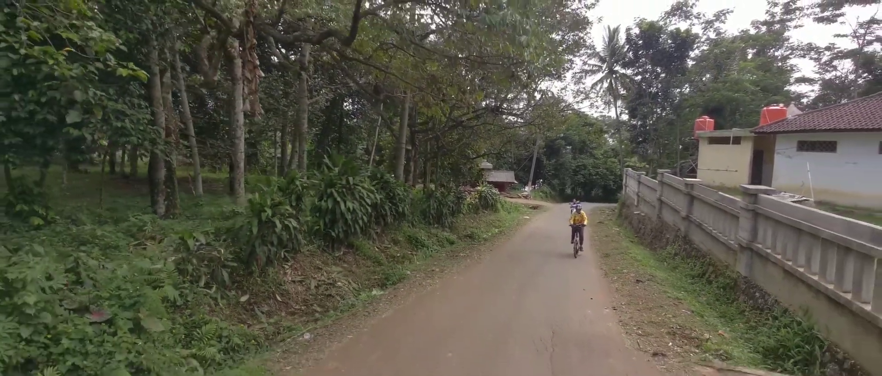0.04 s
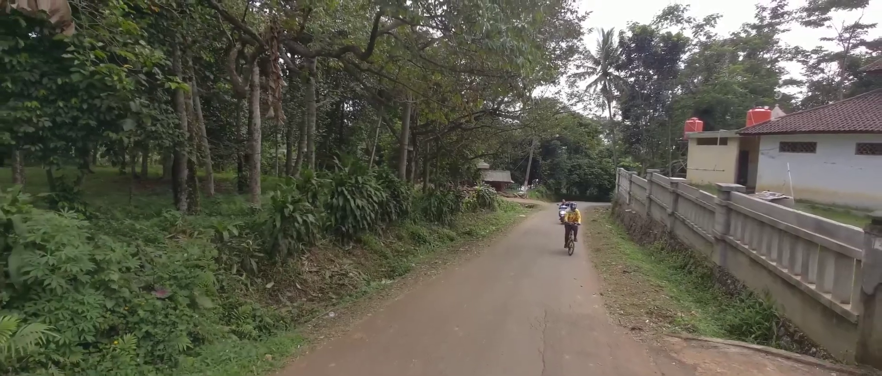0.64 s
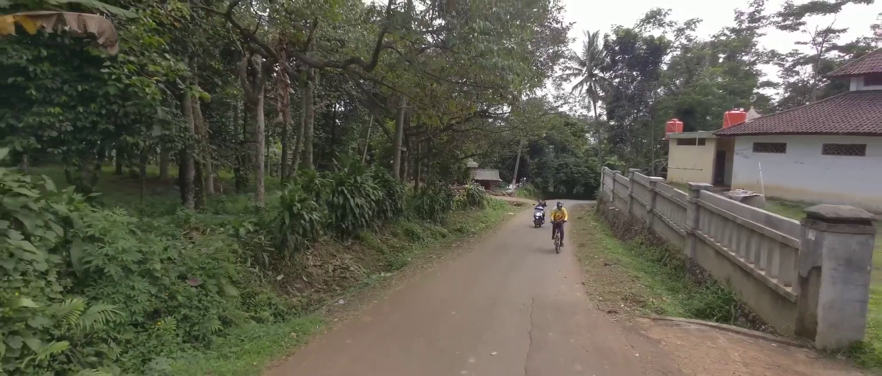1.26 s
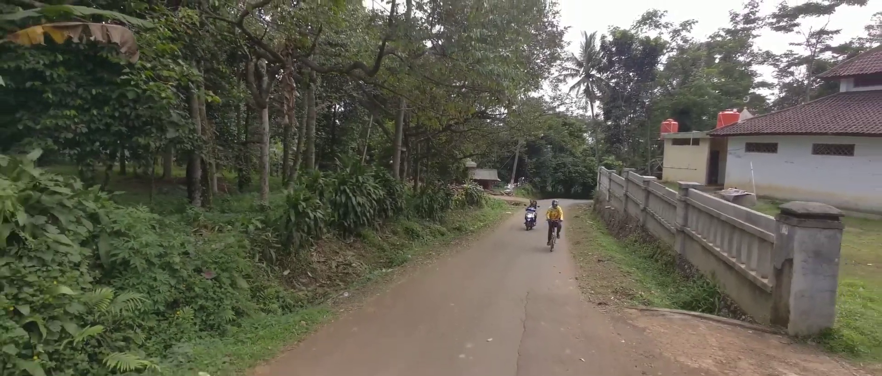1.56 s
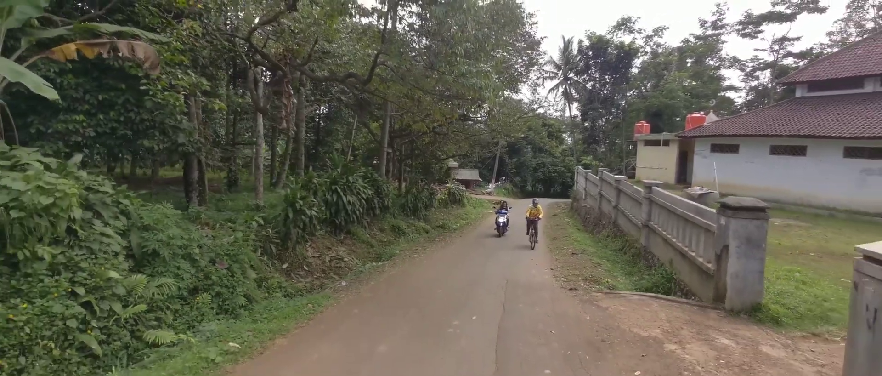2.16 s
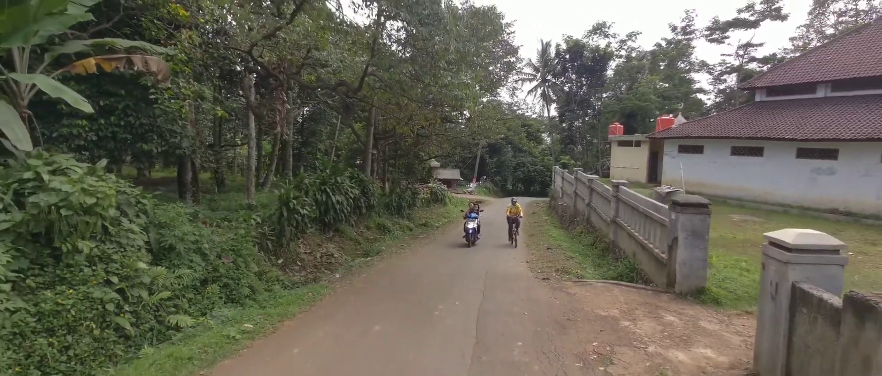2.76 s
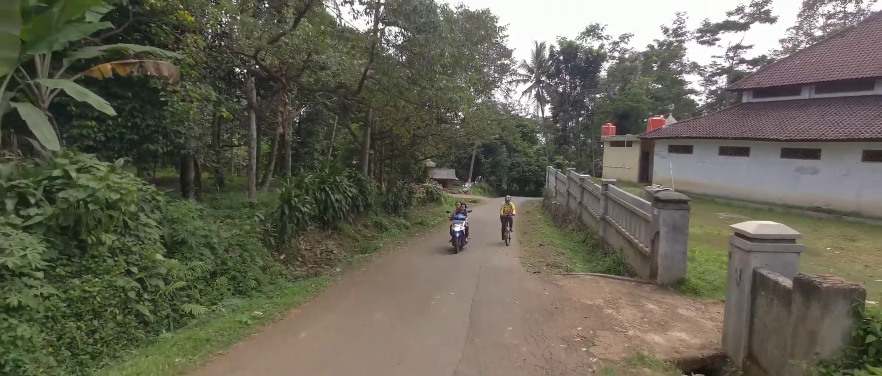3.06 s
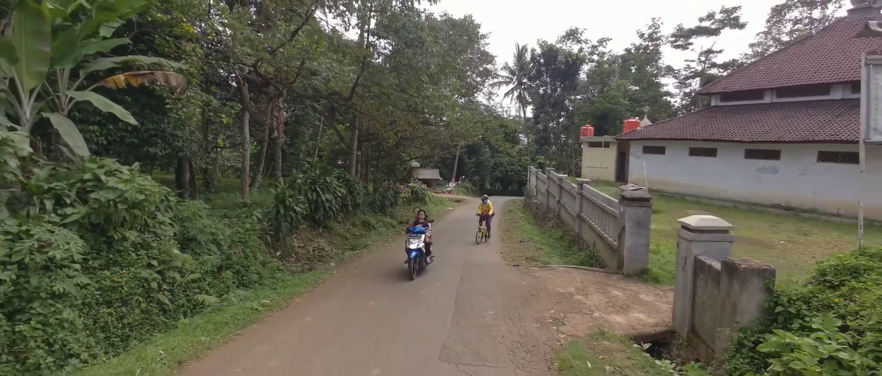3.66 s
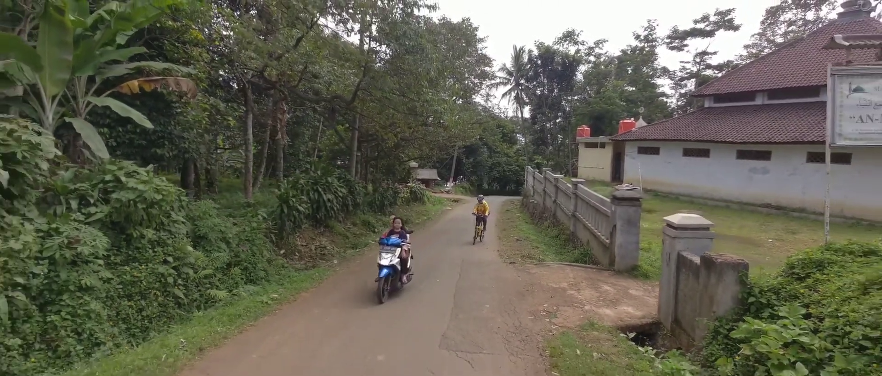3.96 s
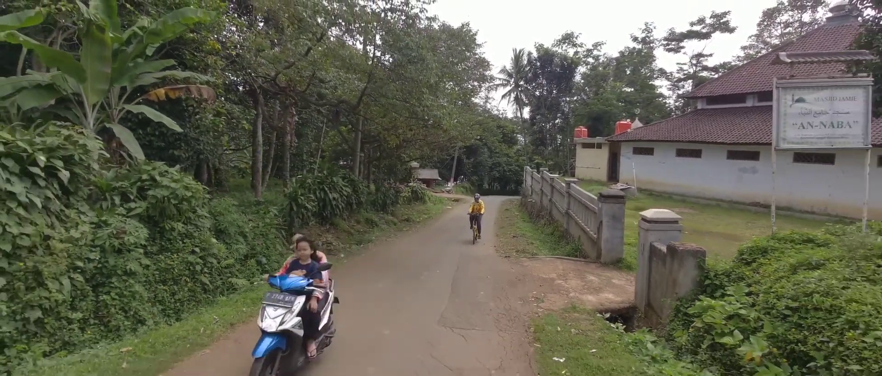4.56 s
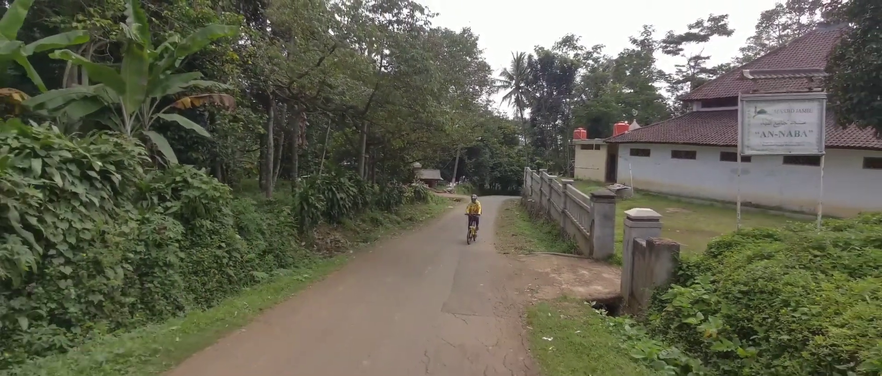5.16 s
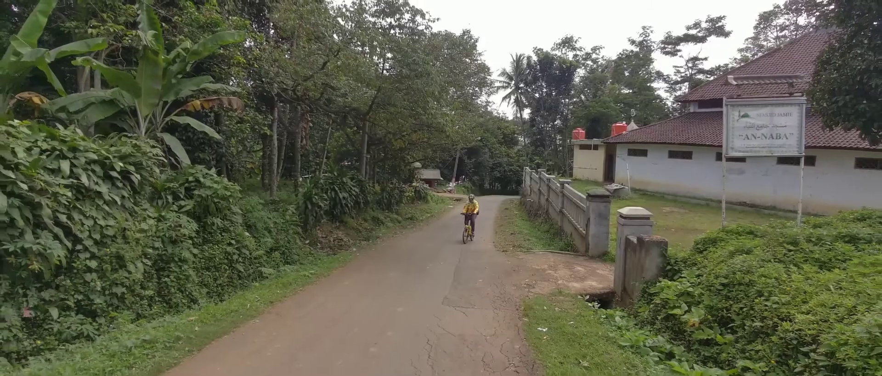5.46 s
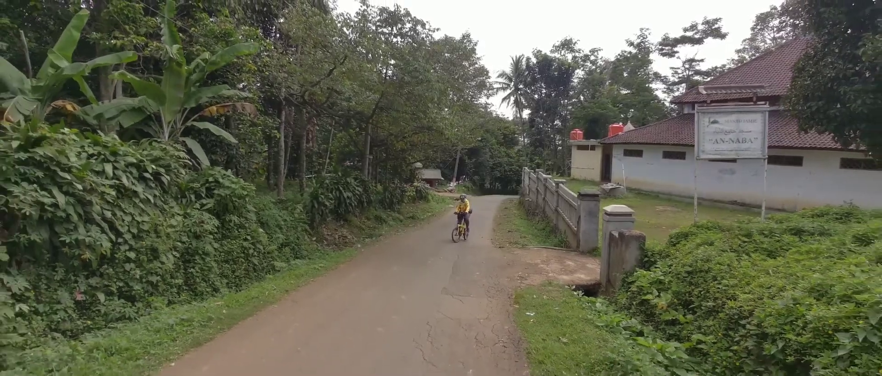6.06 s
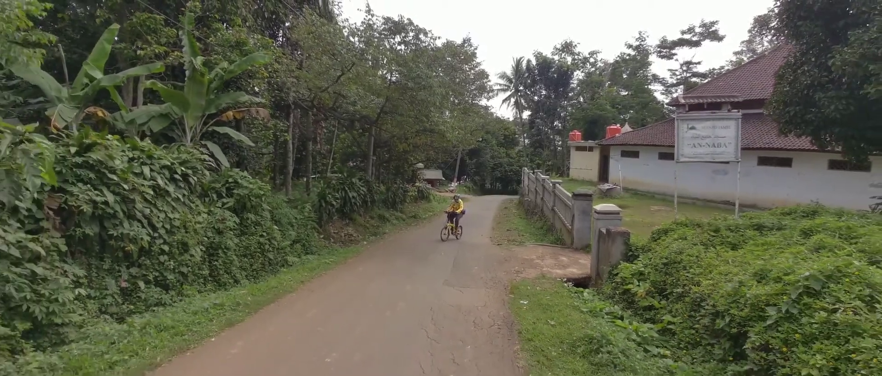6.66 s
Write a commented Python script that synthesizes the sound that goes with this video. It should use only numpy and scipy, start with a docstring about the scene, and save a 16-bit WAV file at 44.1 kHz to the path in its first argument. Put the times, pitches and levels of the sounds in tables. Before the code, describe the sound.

A small four-stroke scooter putters in the distance on a village road, over quiet, low outdoor air. It holds a steady throttle, swelling slightly around 1.3 and 2 seconds. Light ringing ticks come at about 1, 2 and 3.8 seconds, and a slow walker's soft soles thud dully at about 2.6 and 3.7 seconds. From about 4 seconds the engine grows clearly louder, with a low hum, a pulsing intake rasp and belt clatter. It is loudest between 5 and 6 seconds, passing close to the microphone with a hiss of tyres and a brief rough whine. The pitch then dips as the throttle eases, and the exhaust pulses recede until the end, near 7 seconds. A very faint high fizz runs throughout, with a few barely audible, thin swooping whistles, mostly after 6 seconds.

```python
"""On a village road a small four-stroke scooter approaches at steady throttle, passes close and eases off.
Its sources are directional: from the front one hears crank hum and the rasp of air drawn into the airbox,
alongside the clatter of the belt drive and the hiss of tyres, from behind pulses ringing in the silencer.
Someone walks slowly along the road, with a few light ringing ticks and the damped thuds of soft soles.
Faint whistles swoop in the top treble, over quiet outdoor air and a very faint fizz."""
import sys
import numpy as np
from scipy import signal
from scipy.fft import rfft, irfft, next_fast_len
from scipy.io import wavfile
from scipy.ndimage import uniform_filter1d, map_coordinates

SR = 44100
rng = np.random.default_rng(int(sys.argv[2]) if len(sys.argv) > 2 else 0)


def transcribe(u):
    """Save the signal u as a 16-bit wav file named by the first command-line argument.

    u: samples, shape (n,) or (channels, n), limited to [-1, 1]; the rate is SR.
    q: integer samples, one column per channel.
    """
    v = np.clip(np.atleast_2d(u).T, -1, 1)
    q = np.round(v * 32767).astype(np.int16)
    wavfile.write(sys.argv[1], SR, q)


N = 305318
TIME = np.arange(N) / SR
TOP_HZ = 15550
PASS_S, SPEED_M_PER_S, CLOSEST_M = 5.795, 5.94, 2.396


def amp(db):
    """Amplitude ratio of a level in decibels."""
    return 10 ** (np.asarray(db) / 20)


def unit(x):
    """Normalisation to rms 1."""
    return x / np.sqrt(np.mean(x ** 2) + 1e-20)


def curve(rows):
    """Linear interpolation of (seconds, value) points, per sample."""
    return np.interp(TIME, *np.transpose(rows))


def wobble(rate_hz):
    """Slow random modulation: a spline through Gaussian knots."""
    knots = rng.standard_normal(int(N * rate_hz / SR) + 4)
    at = np.arange((len(knots) - 1) * 6) / 6
    return np.interp(TIME * rate_hz, at, map_coordinates(knots, [at], order=2))


def filtered(x, response):
    """Linear filtering: the spectrum of x times a frequency response."""
    size = next_fast_len(N + SR // 4)
    return irfft(rfft(x, size) * response(np.fft.rfftfreq(size, 1 / SR)), size)[:N]


def coloured(x, spectrum):
    """Spectral shaping by (Hz, dB) points on a log axis, at rms 1."""
    points_hz, db = np.transpose(spectrum)
    return unit(filtered(x, lambda hz: amp(np.interp(np.log(hz + 1), np.log(points_hz), db, -120, -120))))


def position():
    """Uniform straight motion: distance (m) and the listener's bearing from the nose (degrees)."""
    ahead_m = SPEED_M_PER_S * (PASS_S - TIME)
    return np.hypot(ahead_m, CLOSEST_M), np.degrees(np.arctan2(CLOSEST_M, ahead_m))


def passing(level_db, doubling_db, rear_db, lobes=(), edge=2):
    """Spreading loss per doubling of distance, plus directivity: a part's level in dB.
    Each lobe: bearing in degrees, half width in degrees, gain in dB."""
    distance, bearing = position()
    spread_db = level_db - doubling_db * np.log2(distance / CLOSEST_M)
    behind = (1 - np.cos(np.radians(bearing))) / 2
    lobes_db = sum(db * np.exp(-np.abs((bearing - aim) / width) ** edge) for aim, width, db in lobes)
    return spread_db + rear_db * behind + lobes_db


def facing(turns_s):
    """Crossfade weights of the scooter's sides, each facing the listener at its time in turns_s."""
    return np.array([np.interp(TIME, turns_s, row) for row in np.eye(len(turns_s))])


def radiated(x, spectra, turns_s):
    """Directivity varies with frequency, so the colour of x changes as the scooter shows its sides."""
    return sum(share * coloured(x, spectrum) for share, spectrum in zip(facing(turns_s), spectra))


def stroke(cycle, at, sharpness):
    """Periodic amplitude modulation: a smooth gate that peaks at the given part of each cycle."""
    return unit(np.exp(sharpness * np.cos(2 * np.pi * (cycle - at))))


def burst(cycle, at, depth, decay):
    """Periodic fast attack and exponential decay; at and decay are parts of a cycle."""
    since = (cycle - at) % 1
    return unit(1 + depth * np.exp(-since / decay) * (1 - np.exp(-10 * since / decay)))


def rasp(cycle, rough):
    """Quasi-periodic noise: a slowly changing rattle each cycle, with a power share rough of turbulence."""
    size = SR // 36  # about one cycle
    patterns = irfft(np.exp(2j * np.pi * rng.random((4, size // 2 + 1))), size)
    shares = np.array([wobble(2.017) for _ in patterns])
    looped = np.array([np.interp(cycle % 1 * size, np.arange(size), pattern) for pattern in patterns])
    rattle = unit((shares * looped).sum(axis=0) / np.linalg.norm(shares, axis=0))
    return np.sqrt(1 - rough) * rattle + np.sqrt(rough) * rng.standard_normal(N)


def swells():
    """Gaussian rises and falls of level in dB, for exhaust, intake and drive."""
    # Each row: centre and half length in seconds, then exhaust, intake and drive gains in dB.
    rises = [(1.323, 0.27, 3, 4.5, 2.5), (1.97, 0.36, 6.5, 3, 2), (3.663, 0.92, 1.2, 5.5, 0.5),
             (6.82, 0.14, 0.5, 7.5, 2)]
    return sum(np.outer(gains_db, np.exp(-((TIME - s) / half) ** 2)) for s, half, *gains_db in rises)


def hum_level(ripple_s=0.61, crest_s=1.04, ripple_db=2, full_depth_m=23):
    """Interference with a wall's echo ripples the crank hum's level (dB), more deeply far away."""
    # Each row: time in seconds, hum level in dB before the ripple.
    trend = [(0.2, -58), (0.5, -61), (1.0, -54), (2.7, -60.5), (4.15, -52), (4.45, -44), (4.75, -43.5),
             (5.1, -33.5), (5.8, -37), (6.5, -48), (6.85, -64)]
    depth_db = ripple_db * np.minimum(position()[0] / full_depth_m, 1)
    return curve(trend) + depth_db * np.cos(2 * np.pi * (TIME - crest_s) / ripple_s)


def silencer_phase(gain, size=64):
    """Minimum phase of each harmonic, for a pulse that strikes and then rings in the silencer."""
    harmonics = np.arange(len(gain)) + 1
    log_gain = np.log(np.interp(np.arange(size + 1), np.append(harmonics, size), np.append(gain, .001)))
    mirrored = np.concatenate([log_gain, log_gain[-2:0:-1]])
    return -signal.hilbert(mirrored).imag[harmonics]


def exhaust(cycle, swell_db, shimmer_db=2.0, scatter_rad=0.39, ringing=0.46):
    """One pressure pulse per firing makes a harmonic series; the second harmonic is the crank hum."""
    # Each row: harmonic number, then relative dB from far off, midway, the front, the side and behind.
    harmonics = [(1, -25, -25, -15, -14, -24), (2, -25, 10, 47, 25, -39), (3, -7, -3, -7.5, -3, -30),
                 (4, -5, -9.5, -9.5, 6, 5), (5, 8, -5.5, 0, 0, 1.5), (6, 2.5, -5.5, -4, -6, -4.5),
                 (7, 0, -3, -4.5, -10, -11), (8, 4.5, -6.5, -18, -5, -7), (9, -2.5, -7.5, -15, -17, -13.5),
                 (10, -16, -15.5, -23, -26, -37), (11, -11, -12, -28, -13, -25)]
    # When each of these five faces the listener, in seconds.
    turns_s = [2.2, 3.9, 5.15, 5.751, 6.25]
    notes_db = np.transpose(harmonics)[1:]
    sides = facing(turns_s)
    far, behind = sides[0] + sides[1], sides[-1]
    gain = amp(notes_db.T @ sides)
    side_phases = np.array([silencer_phase(amp(note_db)) for note_db in notes_db])
    phase = ringing * (1 - .3 * behind) * (side_phases.T @ sides)
    # Far away, echoes from trees and walls make each harmonic swell and shift on its own.
    gain *= amp(shimmer_db * far * np.array([wobble(3.836) for _ in gain]))
    phase += scatter_rad * far * np.array([wobble(3.07) + .5 * wobble(20) for _ in gain])
    # No two firings are quite alike in colour or timing.
    gain *= amp((2.1 - .7 * behind) * np.array([wobble(18) for _ in gain]))
    angle = 2 * np.pi * (cycle + .0025 * wobble(36))
    waves = np.sqrt(2) * np.cos(np.arange(1, len(gain) + 1)[:, None] * angle + phase)
    hum = amp(hum_level()) * waves[1]
    gain[1] = 0  # the hum has its own level
    beat = (gain * waves).sum(axis=0) / np.linalg.norm(gain, axis=0)
    level_db = passing(level_db=-32.14, doubling_db=7, rear_db=2) + swell_db
    return hum + amp(level_db + 0.77 * wobble(36)) * beat


def puffs(cycle, swell_db):
    """Jet turbulence leaves the pipe with each pulse, in more distinct bursts from behind."""
    # Each row: frequency in Hz, relative density in dB.
    spectrum = [(50, -41), (100, -2), (200, -5), (350, -1.5), (480, -7.5), (700, -19.5), (1400, -65)]
    # The lobe of the pipe's mouth: bearing and half width in degrees, gain in dB.
    lobes = [(110, 9.5, 12)]
    level_db = passing(level_db=-45, doubling_db=7, rear_db=-6.5, lobes=lobes) + swell_db
    gate = stroke(cycle, at=0.033, sharpness=.26 + .6 * position()[1] / 180)
    return amp(level_db) * coloured(rng.standard_normal(N) * gate, spectrum)


def intake(cycle, swell_db):
    """Pulsating flow makes the airbox bark once a cycle, hardest just before the scooter draws level."""
    # Airbox spectra from six sides. Each row: frequency in Hz, relative density in dB.
    distant = [(220, -26), (330, 7), (400, 3), (520, 3.5), (720, -0.5), (865, 0), (1020, -12), (1700, -22)]
    far = [(220, -29), (380, -0.5), (435, 3), (544, 0.5), (856, -8), (1020, -7), (1250, -52)]
    near = [(240, -22), (350, -1), (460, 4), (610, 5), (700, 7), (830, 10), (920, 1.5), (1080, -29),
            (1250, -45)]
    half_ahead = [(240, -9), (350, -1.5), (446, 8), (620, 5), (800, 6.5), (950, 0.5), (1080, -6),
                  (1300, -30)]
    side = [(240, -18), (400, -22), (500, 4.5), (640, 5), (860, 8), (980, 0), (1100, -9), (1300, -23)]
    rear = [(240, 12), (400, 8.5), (657, 3.5), (799, 10), (980, -5.5), (1200, -37)]
    # When each side faces the listener, in seconds.
    turns_s = [1.3, 3.4, 5.3, 5.48, 5.6, 6.2]
    # Each row: lobe bearing and half width in degrees, gain in dB.
    lobes = [(41.7, 12, 11.5), (64, 8.9, 9), (84, 12.2, 9.5)]
    distance, bearing = position()
    nearness = CLOSEST_M / distance
    exposure = nearness * (1 - bearing / 180)
    flow = rasp(cycle, rough=.5 + .4 * nearness ** 3) * amp(.4 * wobble(12))
    bark = flow * burst(cycle, at=0.136, depth=3 * exposure, decay=0.19)
    level_db = passing(level_db=-45, doubling_db=4.5, rear_db=-2.5, lobes=lobes) + swell_db
    return amp(level_db) * radiated(bark, (distant, far, near, half_ahead, side, rear), turns_s)


def gulps(cycle):
    """Suction between two exhaust pulses gives a low second beat, heard mostly from the front."""
    # The airbox's low gulp. Each row: frequency in Hz, relative density in dB.
    spectrum = [(160, -33), (250, -5.5), (335, -1), (450, -1.5), (650, -17)]
    draw = rasp(cycle, rough=.5) * stroke(cycle, at=.73, sharpness=2.5)
    return amp(passing(level_db=-41, doubling_db=7, rear_db=-13.5)) * coloured(draw, spectrum)


def drive(cycle, swell_db):
    """Impact noise: valve gear and belt drive clatter after each firing, more sharply from close by."""
    # Drive and casing spectra from six sides. Each row: frequency in Hz, relative density in dB.
    far = [(680, 5.5), (1100, 0.5), (1440, -4.5), (1780, -2), (2700, -17), (3300, -10.5), (3750, -15.5),
           (4400, -23)]
    ahead = [(680, -7), (1060, 9.5), (1450, -8), (2100, -3.5), (2650, -15), (3150, -8.5), (3550, -7),
             (3950, -24), (4400, -27)]
    front = [(590, -42), (1000, -1.5), (1080, -11), (1350, -15.5), (1640, -14), (2140, -6.5), (2350, -11),
             (3250, -18), (4400, -39)]
    half_ahead = [(590, -42), (1000, -5), (1500, -3.5), (1730, 7.5), (2170, 2.5), (2420, -11), (3350, -6.5),
                  (3980, -14), (4500, -36)]
    side = [(590, -39), (1000, -2), (1280, -1.5), (1550, -1.5), (1730, 4), (2160, 3.5), (2550, -8.5),
            (3300, -3), (3950, -8), (4500, -34)]
    rear = [(590, -11), (1000, 4), (1120, -12), (1500, -11), (1680, -7.5), (2120, -4.5), (2480, -16),
            (3310, -12.5), (4400, -26), (5720, -48)]
    # When each side faces the listener, in seconds.
    turns_s = [4.0, 4.72, 5.3, 5.52, 5.72, 6.4]
    # Each row: lobe bearing and half width in degrees, gain in dB.
    lobes = [(23.9, 7.9, 4.7), (57, 6.9, 4.6), (98, 37, 2.8)]
    nearness = CLOSEST_M / position()[0]
    clatter = rasp(cycle, rough=.74) * burst(cycle, at=.08, depth=.2 + .85 * nearness, decay=.22)
    level_db = passing(level_db=-43.5, doubling_db=6.5, rear_db=-5.5, lobes=lobes, edge=3.4) + swell_db
    return amp(level_db) * radiated(clatter, (far, ahead, front, half_ahead, side, rear), turns_s)


def tyres(cycle):
    """Rolling noise on grit merges with engine hiss, modulated at each turn of the crank."""
    # Tyre spectra from four sides. Each row: frequency in Hz, relative density in dB.
    front = [(2710, -38), (4600, -5), (4960, -10), (5960, -9.5), (9000, -32), (11700, -21)]
    half_ahead = [(2600, -24), (3800, -9), (5200, -3), (5900, -16), (6600, -8.5), (8000, -30), (9300, -21),
                  (10900, -22), (15000, -36)]
    side = [(2240, -28), (3800, -8), (4360, -11), (4920, -6), (6000, -18), (7200, -19), (8500, -25),
            (9300, -24), (15000, -41)]
    rear = [(2470, -30), (4200, -7), (4610, -2), (5100, -5), (5540, -1), (6360, -16), (7220, -8),
            (9000, -19), (11700, -45)]
    # When each side faces the listener, in seconds.
    turns_s = [5.3, 5.56, 5.82, 6.15]
    # Each row: lobe bearing and half width in degrees, gain in dB.
    lobes = [(32.2, 8.8, 1.3), (85.3, 40, 11.3), (61, 9.4, 2.6)]
    grit = rng.standard_normal(N) * amp(2.5 * wobble(900))
    hiss = grit * stroke(2 * cycle, at=0.37, sharpness=0.19)
    level_db = passing(level_db=-72.5, doubling_db=4.5, rear_db=5.5, lobes=lobes, edge=4.6)
    return amp(level_db) * radiated(hiss, (front, half_ahead, side, rear), turns_s)


def multipath(x, patchy_db=1.7):
    """Interference of changing paths past road, wall and hedge lays drifting patches of colour on x."""
    spectra = signal.stft(x, nperseg=1024)[2]
    across_bands = uniform_filter1d(rng.standard_normal(spectra.shape), size=5, axis=0)
    patches = unit(uniform_filter1d(across_bands, size=16, axis=1))
    return signal.istft(spectra * amp(patchy_db * patches), nperseg=1024)[1][:N]


def outdoor_air(level_db=-56.5):
    """Ambient noise, broadband and nearly steady, strongest in the bass."""
    # Each row: frequency in Hz, relative density in dB.
    spectrum = [(18, -21), (42, -9), (70, -5.5), (119, -3), (190, -7.5), (252, -13), (415, -5.5),
                (880, -18), (984, -15), (1300, -27.5), (1720, -24), (2750, -34.5), (3350, -37),
                (15500, -39.5)]
    return amp(level_db + 0.41 * wobble(5.4)) * coloured(rng.standard_normal(N), spectrum)


def fizz(level_db=-87, pulse_hz=30):
    """Amplitude-modulated treble noise: a faint electronic fizz."""
    pulsing = rng.standard_normal(N) * stroke(TIME * pulse_hz, at=0, sharpness=1.3)
    return amp(level_db) * coloured(pulsing, [(6000, -25), (7200, -11), (8600, -31)])


def whistles(level_db=-78, flutter_db=4):
    """Parabolic frequency sweeps: each thin whistle flutters down from the top of the band and back."""
    # Each row: centre in seconds, lowest frequency in Hz, half length in seconds.
    swoops = [(0.46, 11600, 0.045), (4.71, 12300, .025), (6.125, 12000, .055), (6.22, 14000, .025),
              (6.3, 13700, .015), (6.807, 11100, 0.061)]
    out = np.zeros(N)
    for s, lowest_hz, half in swoops:
        sweep = np.linspace(-1, 1, round(2 * half * SR))
        hz = lowest_hz + (TOP_HZ - lowest_hz) * sweep ** 2
        envelope = signal.windows.tukey(len(hz)) * amp(level_db + flutter_db * wobble(200)[:len(hz)])
        tone = envelope * np.sin(2 * np.pi * np.cumsum(hz) / SR)
        span = out[round((s - half) * SR):][:len(hz)]
        span += tone[:len(span)]
    return out


def ticks(rise_s=.0008, crack_db=-7, crack_t60=0.015, tail_db=-22, tail_t60=.5):
    """Small hard contacts excite damped modes, whose ringing scatters faintly from the walls."""
    # Each row: start in seconds, then the levels of knock, body and ping in dB.
    contacts = [(0.9758, -52.5, -48, -52.5), (1.978, -60, -50.5, -53.5), (3.761, -49, -61, -70)]
    # A group each for knock, body and ping. Each mode: frequency in Hz, gain in dB, T60 in seconds.
    mode_groups = [
        [(863, 8.5, 0.062), (1264, -2, 0.049)],
        [(1904, 1.5, 0.052), (2160, 3, 0.034), (2410, -3, 0.045)],
        [(3180, -2, 0.049), (3430, -.5, 0.047)],
    ]
    t, out = np.arange(SR // 4) / SR, np.zeros(N)
    for s, *parts_db in contacts:
        ring = sum(amp(part_db + db - 60 * t / t60) * np.sin(2 * np.pi * hz * t)
                   for part_db, modes in zip(parts_db, mode_groups) for hz, db, t60 in modes)
        ring *= 1 - np.exp(-t / rise_s)
        crack = amp(parts_db[1] + crack_db - 60 * t / crack_t60) * rng.standard_normal(len(t))
        walls = rng.standard_normal(len(t)) * amp(-60 * t / tail_t60)
        scatter = amp(tail_db) * signal.fftconvolve(ring, walls / np.linalg.norm(walls))[:len(t)]
        out[round(s * SR):][:len(t)] += ring + crack + scatter
    return filtered(out, lambda hz: 1 / (1 + (hz / 8500) ** 4))


def far_whine(cycle, harmonic=23, level_db=-61, at_s=1.3, half_s=0.31, blur_rad=1.5):
    """Random phase modulation roughens one high engine harmonic, heard briefly from far off."""
    envelope = amp(level_db + 1.7 * wobble(20.1)) * np.exp(-((TIME - at_s) / half_s) ** 4)
    return envelope * np.sin(2 * np.pi * harmonic * cycle + blur_rad * wobble(60))


def steps(rise_s=0.0062):
    """Heavy damping: a soft sole makes a low thud that dies within a few cycles."""
    # Each row: start in seconds, level in dB, frequency in Hz.
    thuds = [(2.581, -42, 107), (3.7222, -39.5, 125), (3.751, -37, 115)]
    t, out = np.arange(SR // 4) / SR, np.zeros(N)
    envelope = t / rise_s * np.exp(1 - t / rise_s)
    for s, db, hz in thuds:
        out[round(s * SR):][:len(t)] += amp(db) * envelope * np.sin(2 * np.pi * hz * t)
    return out


def belt_whines(cycle, half_width_deg=9.5, stray_db=-21, blur_rad=1.2, slip_rad=3, flutter_db=3.5):
    """Beaming: the belt case sweeps rough tones past, which follow the engine and wander with belt slip."""
    # Each row: multiple of the firing rate, level in dB at the closest distance, bearing in degrees.
    tones = [(37, -51.5, 116), (39, -52, 129), (41.3, -51, 120), (55.9, -48, 125), (60.6, -54, 106),
             (62.6, -53, 126)]
    distance, bearing = position()
    out = np.zeros(N)
    for multiple, db, aim in tones:
        beam = np.exp(-((bearing - aim) / half_width_deg) ** 2) + amp(stray_db)
        phase = 2 * np.pi * multiple * cycle + blur_rad * wobble(110) + slip_rad * wobble(22)
        out += beam * amp(db + flutter_db * wobble(40)) * np.sin(phase)
    return out * CLOSEST_M / distance


def scene():
    """Superposition of the scooter, timed by one engine cycle, the walker and the background."""
    # Each row: time in seconds, firing rate in Hz with the Doppler shift included.
    firing_rate = [(0.0, 36.92), (2.7, 36.85), (3.2, 36.48), (4.3, 36.67), (5.05, 36.51), (5.55, 35.64),
                   (5.85, 35.58), (6.2, 33.98), (6.6, 33.48), (6.92, 32.57)]
    cycle = np.cumsum(curve(firing_rate)) / SR - .134  # the first pulse comes .134 of a cycle in
    exhaust_swell_db, intake_swell_db, drive_swell_db = swells()
    pipe = exhaust(cycle, exhaust_swell_db) + puffs(cycle, exhaust_swell_db)
    airbox = intake(cycle, intake_swell_db) + gulps(cycle)
    rolling = multipath(drive(cycle, drive_swell_db) + tyres(cycle))
    scooter = pipe + airbox + rolling + belt_whines(cycle) + far_whine(cycle)
    return (scooter + outdoor_air() + ticks() + steps() + whistles() + fizz())[None]


def record(dry):
    """An ideal low-pass filter removes everything above the band limit."""
    return filtered(dry[0], lambda hz: hz < TOP_HZ)[None]


dry = scene()
out = record(dry)
transcribe(out)
```